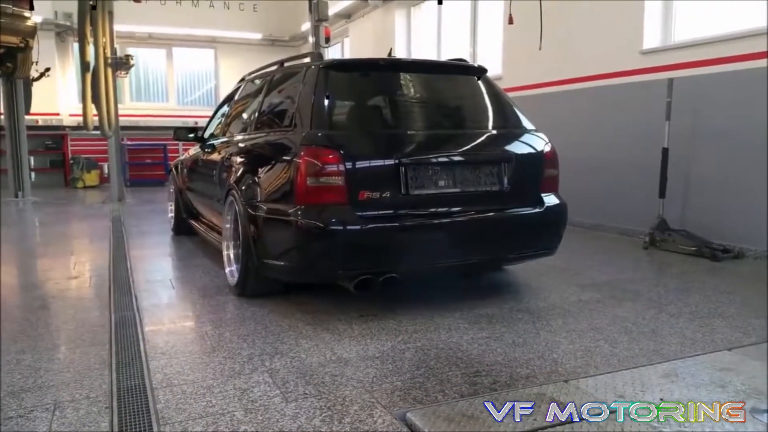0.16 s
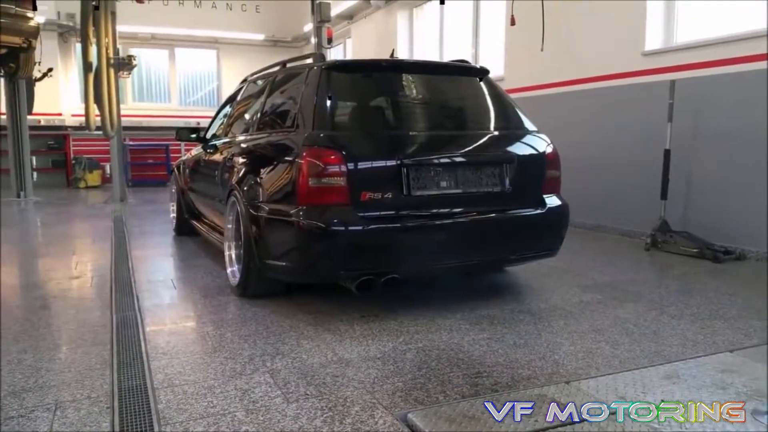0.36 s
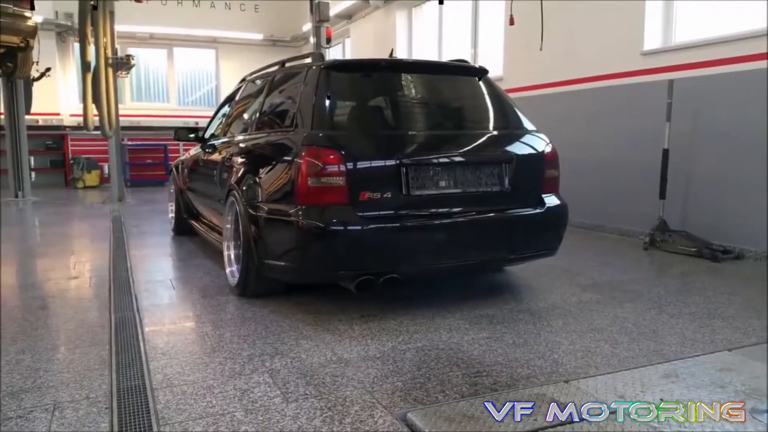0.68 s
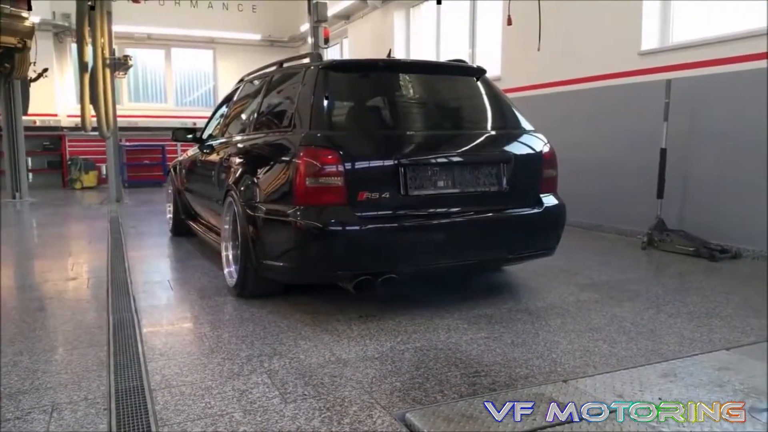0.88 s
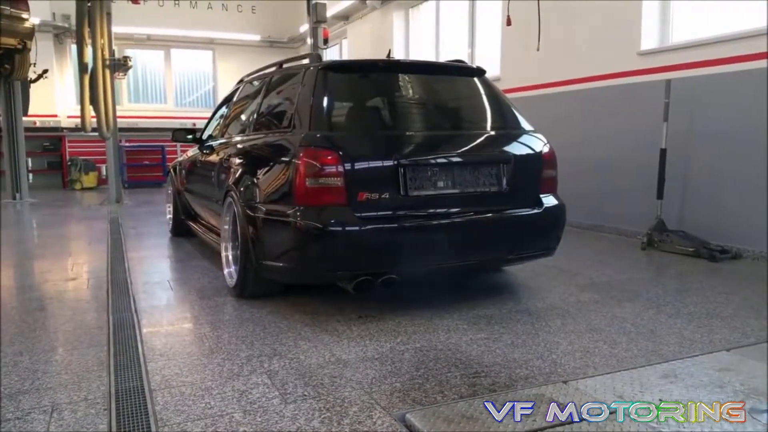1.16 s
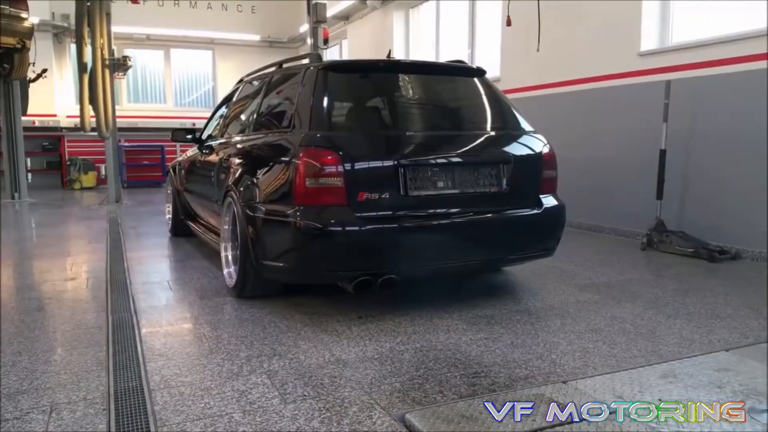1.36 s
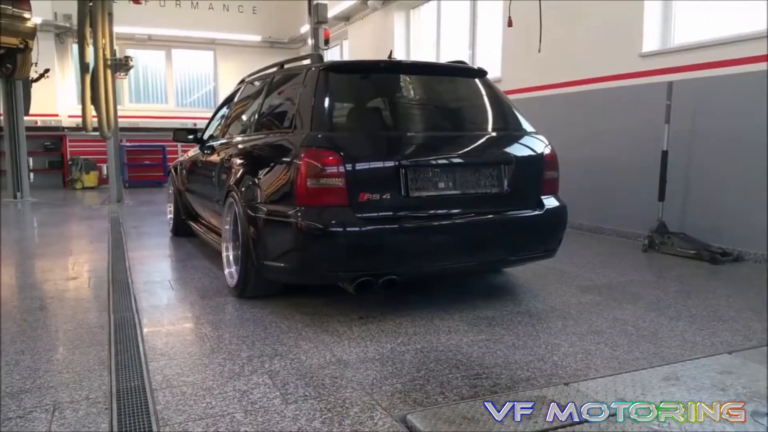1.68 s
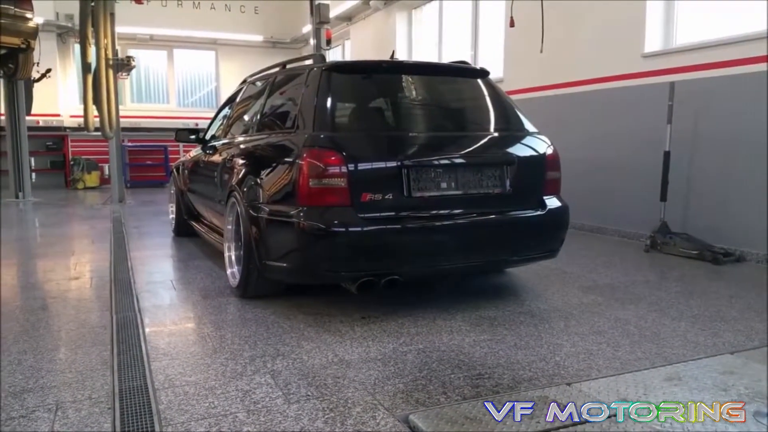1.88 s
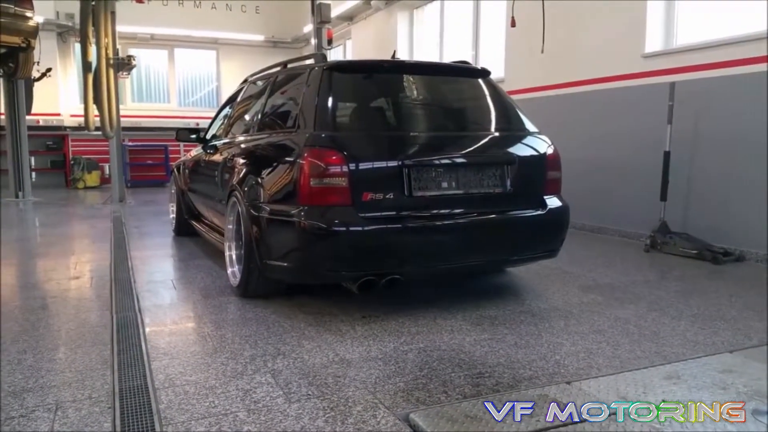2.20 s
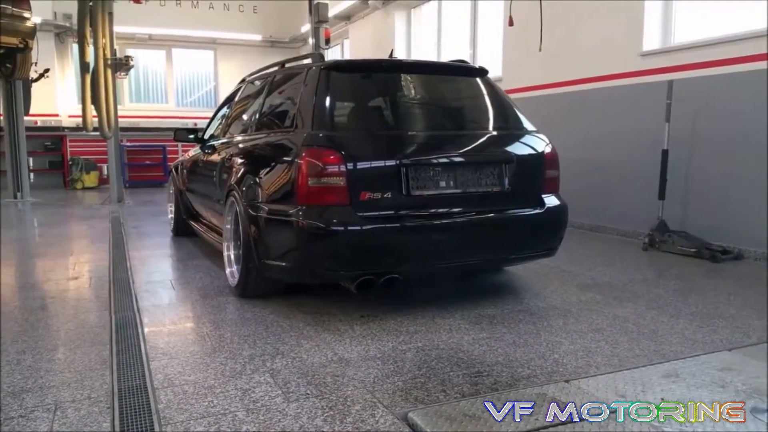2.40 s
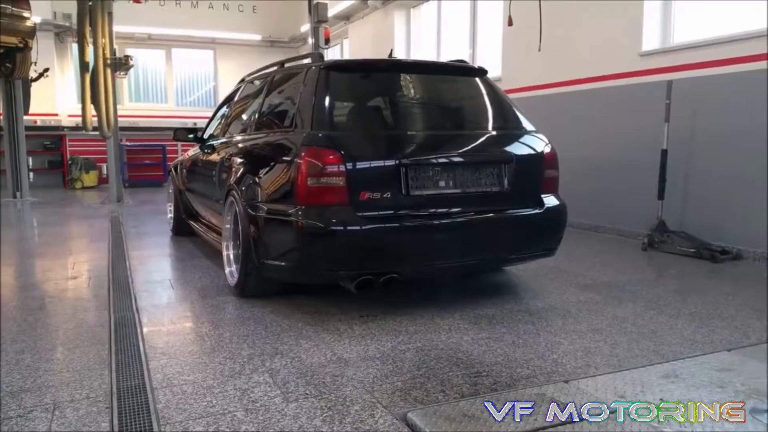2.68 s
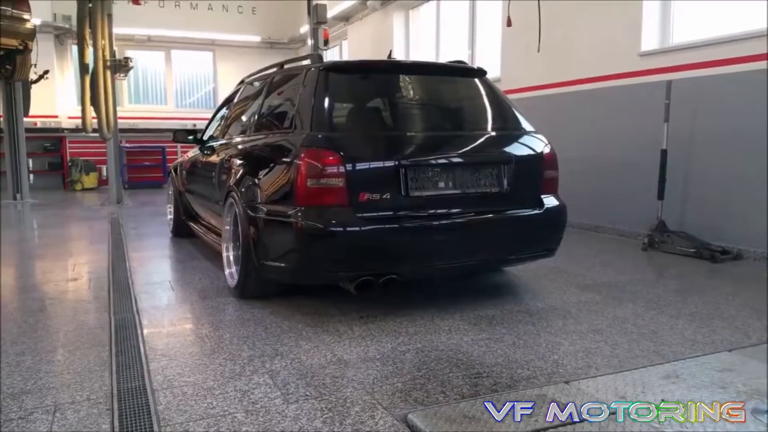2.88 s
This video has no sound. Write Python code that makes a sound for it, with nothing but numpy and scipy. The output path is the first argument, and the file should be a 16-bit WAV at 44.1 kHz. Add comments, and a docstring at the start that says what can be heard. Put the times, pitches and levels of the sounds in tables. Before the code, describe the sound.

Two throttle blips from a six-cylinder car, heard behind its tailpipes in a hard-walled workshop.

```python
"""A low engine murmur leaps up into the first of two blips: a six-cylinder car in a hard-walled workshop, from behind.
On throttle the tailpipes sing a rising firing note, built from wavering cosines that ring fixed resonances.
Off throttle the revs sink under a ragged burble of uneven pulses, a rasp of puffing noise and a few pops.
A growl joins at high revs and a hiss follows engine speed; a limiter holds the loud parts down."""
import sys
import numpy as np
from scipy import signal
from scipy.fft import rfft, irfft
from scipy.io import wavfile
from scipy.ndimage import uniform_filter1d, minimum_filter1d

SR = 44100
rng = np.random.default_rng(int(sys.argv[2]) if len(sys.argv) > 2 else 0)


def int16_out(signal):
    """Quantize to a 16-bit WAV file."""
    q = np.round(np.clip(np.atleast_2d(signal).T, -1, 1) * 32767)
    wavfile.write(sys.argv[1], SR, q.astype(np.int16))


N = 134505
TIME = np.arange(N) / SR

# engine speed before random jitter: time_s, firing_rate_hz
ENGINE_SPEED = [(0, 162), (.11, 156), (.21, 180), (.3, 241), (.35, 277), (.41, 306), (.5, 306), (.68, 298),
                (.8, 262), (.95, 234), (1.2, 192), (1.32, 166), (1.42, 165), (1.53, 178), (1.6, 225),
                (1.68, 290), (1.77, 330), (1.88, 313), (2.02, 302), (2.22, 283), (2.45, 240), (2.6, 226),
                (2.75, 198), (2.9, 168), (3.05, 155)]
# how far the throttle is open: time_s, opening (0 shut to 1 wide open)
THROTTLE_OPENING = [(0, 0), (.1, 0), (.19, .3), (.32, 1), (.41, 1), (.47, .1), (.7, 0), (1.42, 0),
                    (1.52, .4), (1.62, 1), (1.8, 1), (1.815, 0), (3.05, 0)]


def amp(db):
    """Turns decibels into a gain."""
    return 10 ** (np.asarray(db) / 20)


def unit(x):
    """Scales a signal to an rms of one."""
    return x / np.sqrt(np.mean(x ** 2) + 1e-20)


def curve(points):
    """Joins points with straight lines to give a value at every sample."""
    return np.interp(TIME, *np.transpose(points))


def read(points, hz):
    """Reads a table of values against frequency, on a log-frequency axis."""
    f, value = np.transpose(points)
    return np.interp(np.log(hz + 1), np.log(f), value)


def wander(hz):
    """Random motion of rms one that fades out above the given rate."""
    f = np.fft.rfftfreq(N, 1 / SR)
    spectrum = rfft(rng.standard_normal(N))
    return unit(irfft(spectrum / (1 + (f / hz) ** 2) ** 2, N))


def colour(x, points, size=8192):
    """Shapes the spectrum with a filter that never sounds early; only the table's shape counts."""
    log_gain = np.log(amp(read(points, abs(np.fft.fftfreq(size, 1 / SR)))))
    # the phase that belongs to this gain puts the energy as early as possible
    spectrum = np.exp(np.conj(signal.hilbert(log_gain)))
    taps = np.fft.ifft(spectrum).real[:size // 2]
    return signal.fftconvolve(x, taps / np.linalg.norm(taps))[:len(x)]


def resonate(x, hz, width_hz):
    """A fixed resonance with a gain of about one at its peak; a narrow one rings longer."""
    r = np.exp(-np.pi * width_hz / SR)
    pole = r * np.exp(2j * np.pi * hz / SR)
    return 2 * signal.lfilter([1 - r], [1, -pole], x).real


def throttle():
    """Throttle opening at every sample, from 0 to 1."""
    return np.clip(curve(THROTTLE_OPENING), 0, 1)


def raggedness():
    """The engine runs most unevenly at high revs with the throttle shut."""
    ragged_at_hz = 300
    return (1 - throttle()) * (curve(ENGINE_SPEED) / ragged_at_hz) ** 2


def firing_count():
    """The crankshaft's running count of firings: jittery engine speed added up over time."""
    jitter, coasting_jitter, jitter_hz = .004, .022, 60  # jitter as a share of the speed
    depth = jitter + coasting_jitter * raggedness()
    return np.cumsum(curve(ENGINE_SPEED) * (1 + depth * wander(jitter_hz))) / SR


def uneven_firings(turns):
    """One pulse per firing, of random sign and strength, for how far it differs from its neighbours."""
    spread_db = -0.5
    fired = np.diff(np.floor(turns), prepend=0) > 0
    strength = amp(spread_db * np.clip(rng.standard_normal(N), -2, 2))
    return unit(fired * rng.choice([-1, 1], N) * strength)


def workshop(x, wet_db, size=512):
    """Hard walls add a dense tail to the direct sound, each band dying at its own speed."""
    # how long the room rings: pitch_hz, fall_by_60_db_s
    ring_time = [(80, 1), (300, 0.98), (1000, 1), (3000, 0.68), (9000, 0.36)]
    hz, t, z = signal.stft(rng.standard_normal(SR), SR, nperseg=size)
    decay = np.exp(-np.log(1000) * t / read(ring_time, hz)[:, None])
    tail = signal.istft(z * decay, SR, nperseg=size)[1]
    tail[:SR // 200] = 0  # the walls answer no sooner than 5 ms
    wet = signal.fftconvolve(x, tail / np.linalg.norm(tail))[:N]
    return (x + amp(wet_db) * wet) / np.hypot(1, amp(wet_db))


def hiss():
    """Air and moving parts under the bonnet hiss louder with engine speed."""
    # spectrum shape of the hiss: pitch_hz, relative_level_db
    hiss_shape = [(800, -21.5), (2500, 6), (5100, 5), (6100, -15), (9000, -20.5)]
    base_db, db_per_octave, base_at_hz = -43, 9.5, 300
    level_db = base_db + db_per_octave * np.log2(curve(ENGINE_SPEED) / base_at_hz)
    return colour(rng.standard_normal(N) * amp(level_db), hiss_shape)


def rush(turns):
    """Turbulent gas leaves the tailpipes in one puff per firing; uneven puffs make it crackle."""
    # strength of the rush of gas: time_s, level_db
    rush_level = [(0, -18), (.08, -20), (.17, -26), (.3, -27), (.36, -17), (.42, -14.5), (.48, -20),
                  (.6, -17.5), (.8, -17), (1.2, -19), (1.42, -22), (1.5, -29), (1.61, -24.5), (1.68, -14),
                  (1.8, -14), (1.9, -15), (2.3, -18.5), (2.6, -18.5), (3.05, -23.5)]
    # spectrum shape of the rush: pitch_hz, relative_level_db
    rush_shape = [(60, -32.5), (250, 3.5), (430, 3.5), (650, -1), (850, -5.5), (1150, -10.5), (1550, -9.5),
                  (2050, -12), (2700, -20), (3700, -28), (5100, -33), (6100, -41), (9000, -51)]
    pulsing, puff_share, spread_db = .62, .17, 3.5  # puff decay as a share of one firing
    strengths = amp(spread_db * np.clip(rng.standard_normal(N), -2, 2))
    strength = strengths[turns.astype(int)]  # one value held through each firing
    puffs = 1 - pulsing + pulsing * strength * np.exp(-(turns % 1) / puff_share)
    gas = unit(puffs * rng.standard_normal(N))
    return colour(gas * amp(curve(rush_level)), rush_shape)


def burble(turns):
    """Uneven firings thud through the silencer, which dulls each pulse."""
    # strength of the uneven burning: time_s, level_db
    burble_level = [(0, -25), (.15, -28), (.3, -26), (.47, -22), (.56, -15.5), (.85, -19), (1.3, -21),
                    (1.6, -24), (1.77, -20), (1.83, -11.5), (2.0, -13), (2.25, -17), (2.65, -19),
                    (3.05, -22)]
    # spectrum shape of the burble: pitch_hz, relative_level_db
    burble_shape = [(20, -31), (48, -25), (62, -11), (78, -4), (98, -3.5), (122, 2), (150, 0), (195, -11.5),
                    (245, 2), (310, -4), (400, -8), (600, -18), (1200, -39.5), (4000, -66.5)]
    return colour(uneven_firings(turns) * amp(curve(burble_level)), burble_shape)


def growl(turns):
    """At high revs on full throttle the uneven firings bark in the middle range."""
    # spectrum shape of the growl: pitch_hz, relative_level_db
    growl_shape = [(100, -31), (330, -13), (520, 8), (660, 3.5), (770, 3.5), (940, -0.5), (1100, -7),
                   (2000, -28.5), (5000, -64.5)]
    base_db, base_at_hz, db_per_octave = -13, 320, 38
    level_db = base_db + db_per_octave * np.log2(curve(ENGINE_SPEED) / base_at_hz)
    return colour(uneven_firings(turns) * throttle() * amp(level_db), growl_shape)


def pops():
    """Unburnt fuel goes off in the pipe: a short crack of noise over a low thump."""
    # each pop in the exhaust: start_s, crack_db, thump_db, thump_pitch_hz
    pop_list = [(.512, -2, -2, 290), (.539, -9, -8, 385), (.566, -14, -6, 280), (1.455, -34, -13, 90),
                (1.815, -24, -4, 148), (1.845, -24, -5, 155), (1.875, -20, -8, 85), (1.927, -17, -12, 115),
                (2.585, -20, -22, 110)]
    # spectrum shape of the cracks: pitch_hz, relative_level_db
    crack_shape = [(60, -12), (250, 3), (550, 5), (1200, -7), (2200, -12), (3300, -25), (5000, -33),
                   (6200, -43), (9000, -47)]
    crack_rise_s, crack_fade_s, thump_peak_s = .002, .022, .016
    cracks, thumps = np.zeros(N), np.zeros(N)
    for start_s, crack_db, thump_db, thump_hz in pop_list:
        t = np.maximum(TIME - start_s, 0)
        cracks += amp(crack_db) * np.minimum(t / crack_rise_s, 1) * np.exp(-t / crack_fade_s)
        swell = t / thump_peak_s * np.exp(1 - t / thump_peak_s)
        thumps += amp(thump_db) * swell * np.sin(2 * np.pi * thump_hz * t)
    return colour(cracks * rng.standard_normal(N), crack_shape) + thumps


def firing_note(turns):
    """A firm fundamental and rougher upper orders, brighter on throttle, leave resonances ringing."""
    # strength of the firing note before the resonances: time_s, level_db
    note_level = [(0, -13), (.08, -14), (.16, -6.5), (.24, -8), (.3, -9), (.34, -5), (.39, -3.5), (.45, -9),
                  (.57, -13), (.7, -12.5), (.8, -16.5), (.95, -15), (1.15, -24), (1.36, -15), (1.43, -17),
                  (1.5, -6.5), (1.57, -10), (1.66, -2), (1.72, -1.5), (1.78, -5.5), (1.83, -11),
                  (2.02, -11), (2.12, -16.5), (2.42, -11), (2.6, -16.5), (2.78, -22), (2.92, -14),
                  (3.05, -12)]
    # tones that make up the note: multiple_of_firing_rate, shut_throttle_db, open_throttle_db
    orders = [(.5, -20, -22), (1, 0, -1), (1.5, -19, -25), (2, -21, -8.5), (2.5, -23, -26), (3, -26, -15.5),
              (4, -32, -26)]
    # resonances of the pipes and the workshop: pitch_hz, width_hz, gain_db
    booms = [(171, 16, -7), (287, 9, -3), (527, 32, 3), (617, 14, -6), (805, 22, -2), (881, 14, -5)]
    base_flutter, coasting_flutter, flutter_per_order, flutter_hz = .18, .38, .06, 60
    load = throttle()
    flutter = base_flutter + coasting_flutter * raggedness()
    note = np.zeros(N)
    for order, shut_db, open_db in orders:
        level = amp(shut_db + (open_db - shut_db) * load)
        waver = 1 + (flutter + flutter_per_order * order) * wander(flutter_hz)
        note += level * waver * np.cos(2 * np.pi * (order * turns + rng.random()))
    note = note * amp(curve(note_level))
    return note + sum(amp(gain_db) * resonate(note, hz, width_hz) for hz, width_hz, gain_db in booms)


def scene():
    """One crankshaft times the exhaust sounds; they echo in the workshop and the hiss stays direct."""
    # left level minus right level: pitch_hz, difference_db
    balance = [(300, 0), (850, -.2), (1150, -1.35), (5000, -1.2), (8000, -.1)]
    turns = firing_count()
    note = workshop(firing_note(turns), wet_db=-13)
    rough_sounds = burble(turns) + growl(turns) + rush(turns) + pops()
    car = note + workshop(rough_sounds, wet_db=-4.5) + hiss()
    lean_db = read(balance, np.fft.rfftfreq(N, 1 / SR)) / 2  # half to each side
    return irfft(rfft(car) * amp([lean_db, -lean_db]), N)


def record(dry):
    """A fast peak limiter, a soft ceiling that rounds the remaining peaks, then a treble cut."""
    limit_db, recover_db_per_s, window_s = 0.3, 350, 0.0013
    ceiling_db, knee_order, edge_hz = .3, 6, 9100
    over_db = np.maximum(20 * np.log10(abs(dry).max(0) + 1e-9) - limit_db, 0)
    # the gain drops at once and climbs back at a steady rate
    fall = TIME * recover_db_per_s
    gain_db = fall - np.maximum.accumulate(over_db + fall)
    # a short window around each moment lets the gain start down before a peak
    span = max(int(window_s * SR), 1)
    held = dry * amp(uniform_filter1d(minimum_filter1d(gain_db, span), span))
    rounded = held / (1 + abs(held / amp(ceiling_db)) ** knee_order) ** (1 / knee_order)
    treble_cut = signal.firwin(511, edge_hz, window=("kaiser", 9), fs=SR)
    return signal.oaconvolve(rounded, treble_cut[None], "same")


dry = scene()
out = record(dry)
int16_out(out)
```